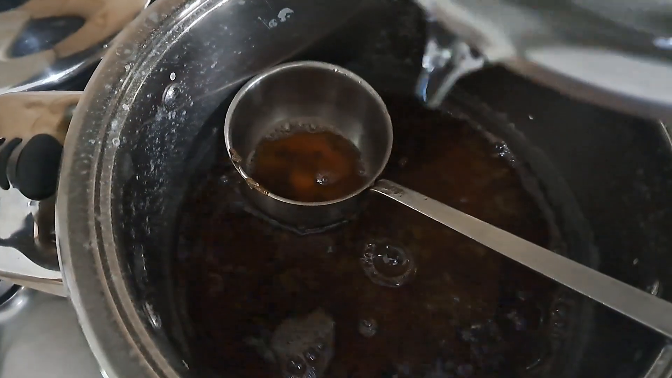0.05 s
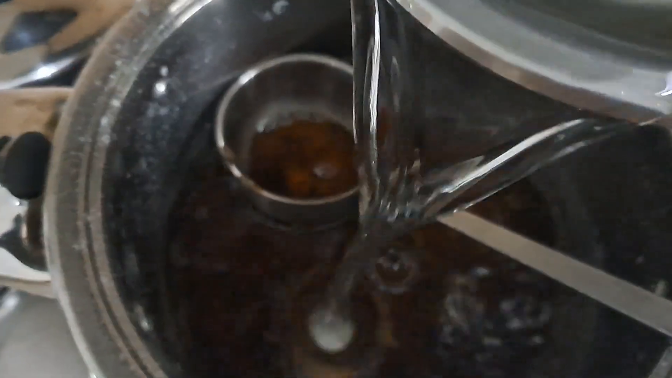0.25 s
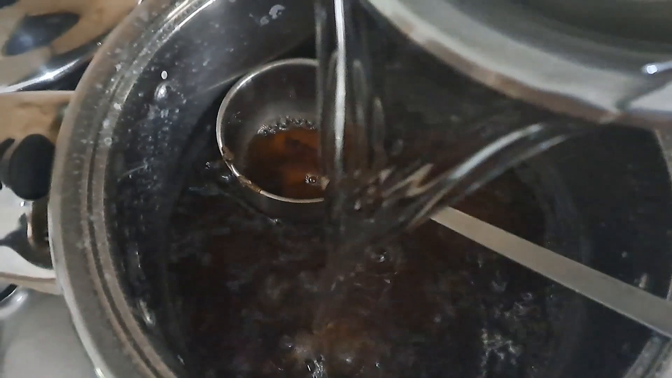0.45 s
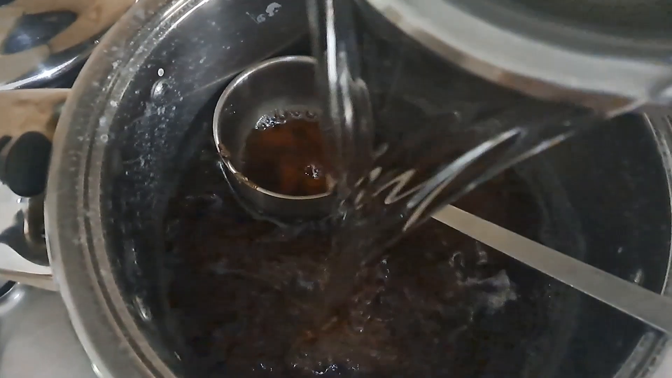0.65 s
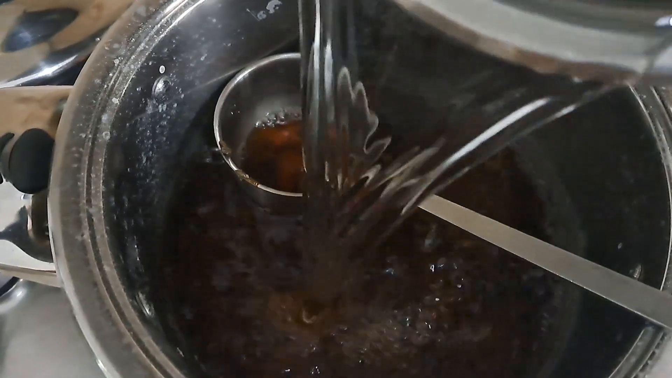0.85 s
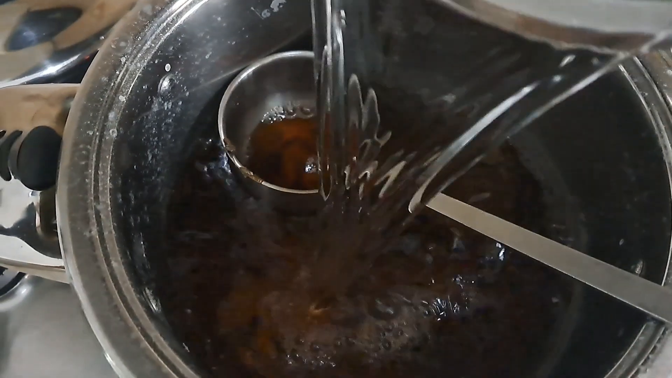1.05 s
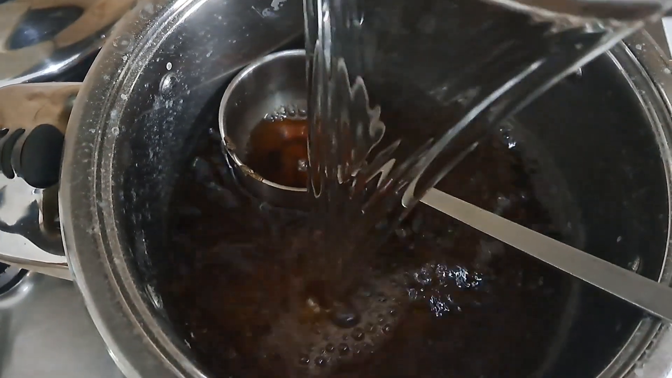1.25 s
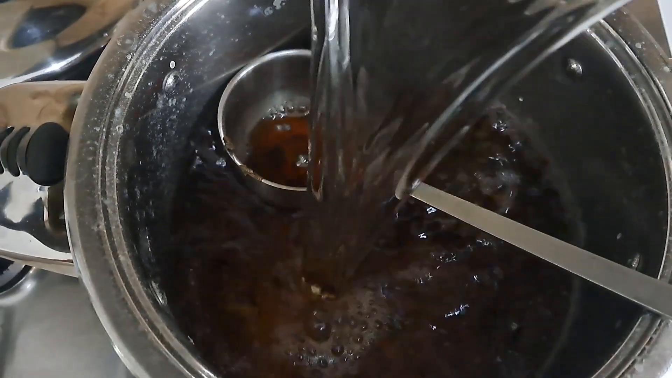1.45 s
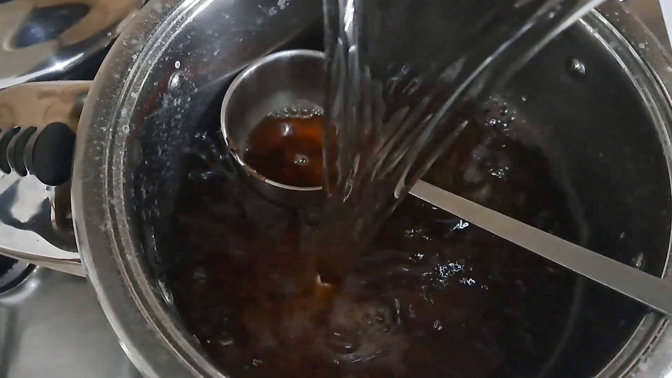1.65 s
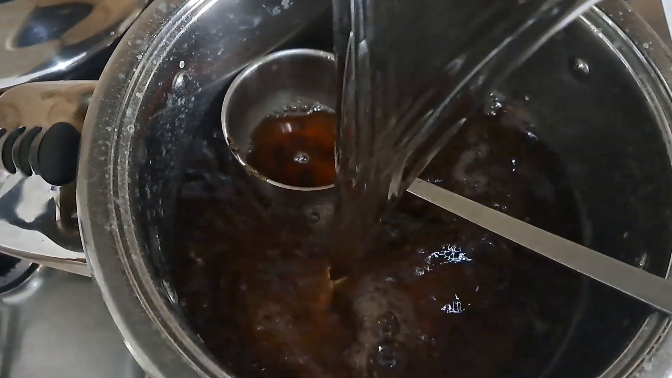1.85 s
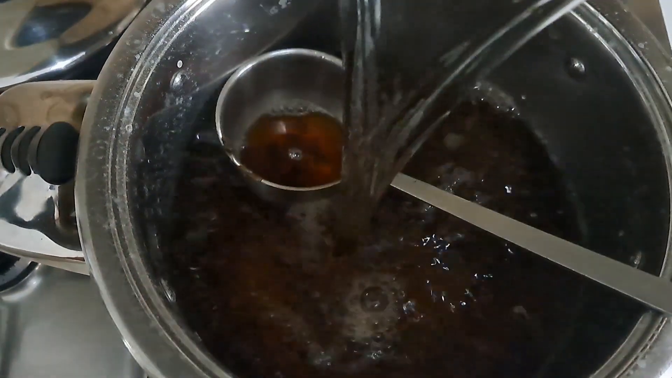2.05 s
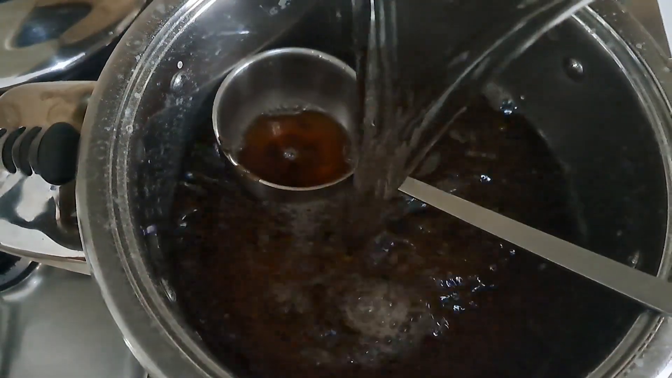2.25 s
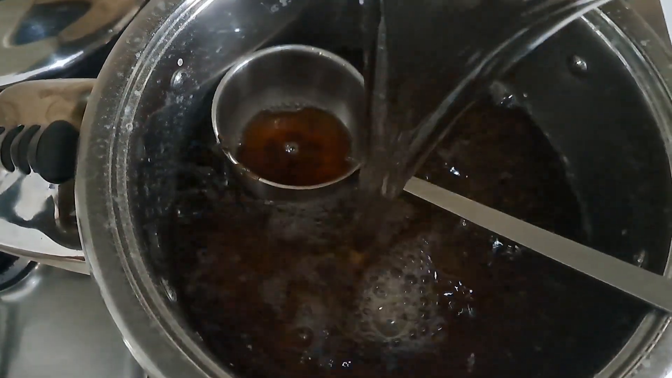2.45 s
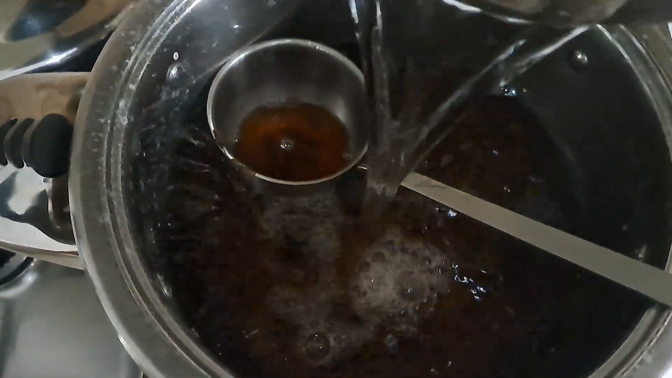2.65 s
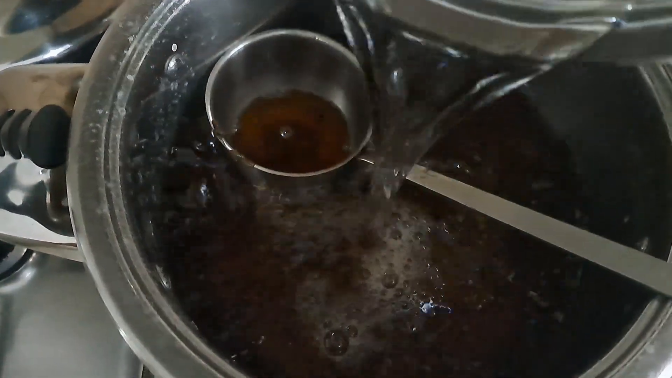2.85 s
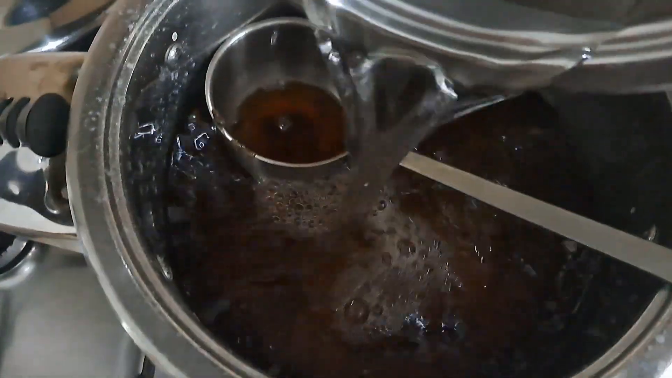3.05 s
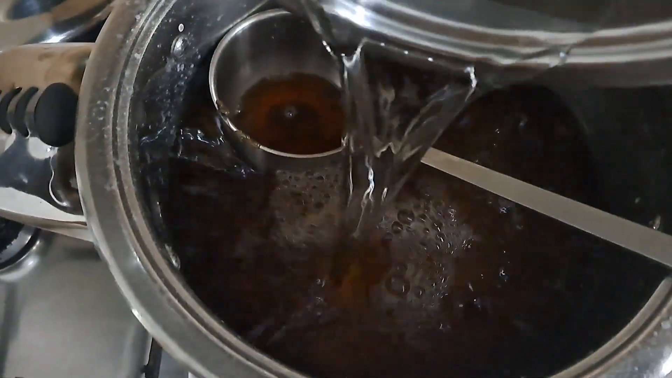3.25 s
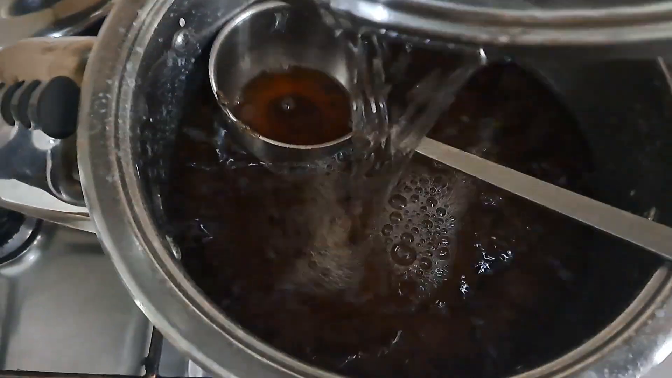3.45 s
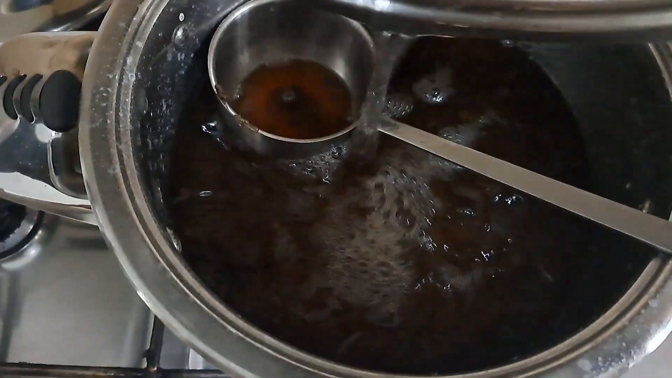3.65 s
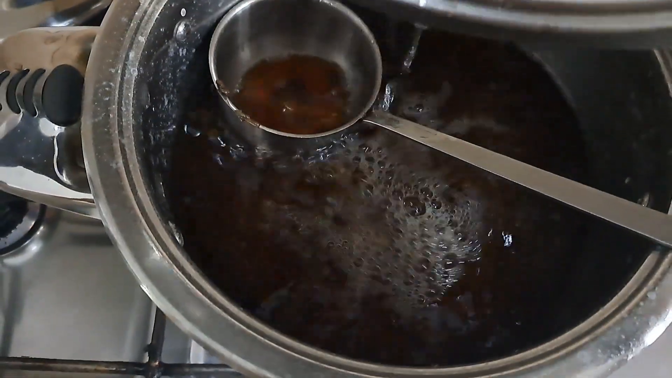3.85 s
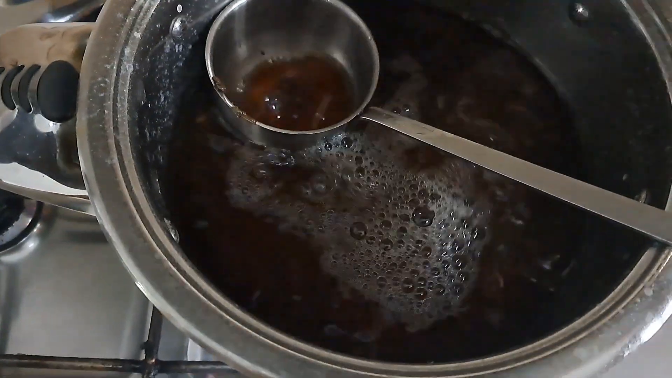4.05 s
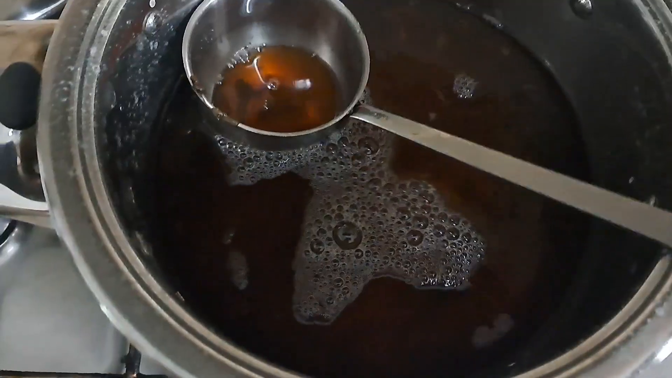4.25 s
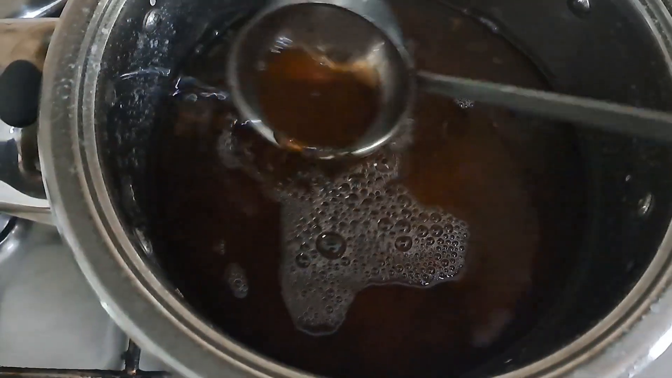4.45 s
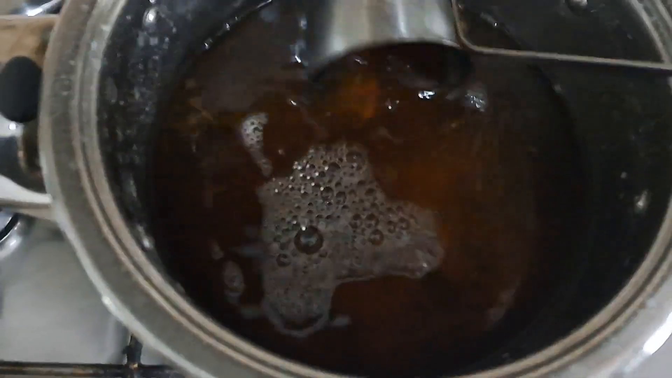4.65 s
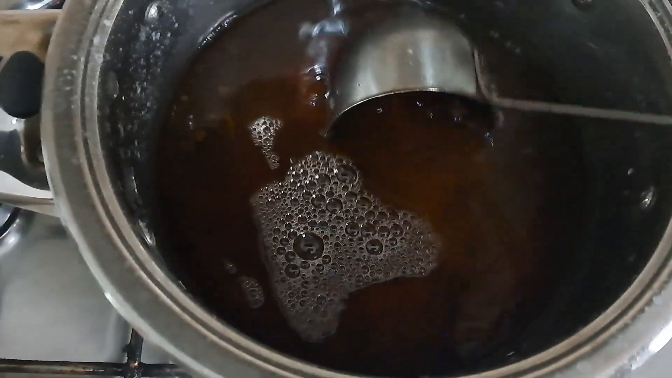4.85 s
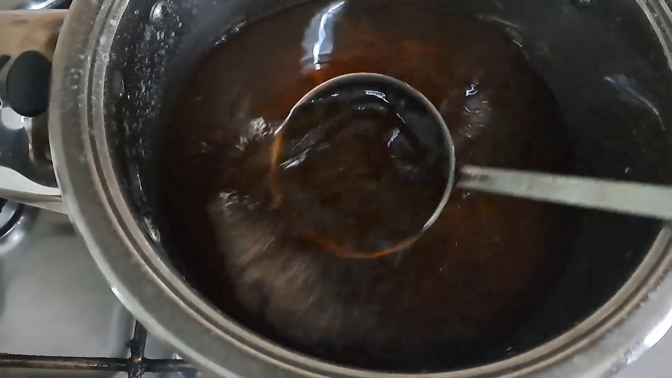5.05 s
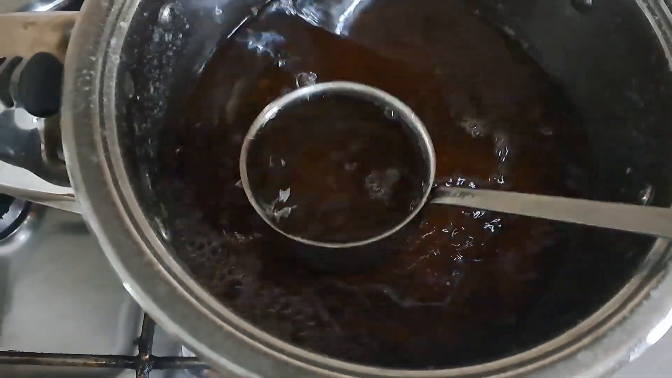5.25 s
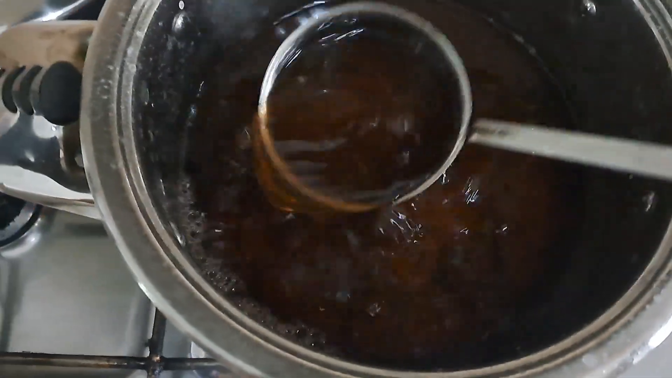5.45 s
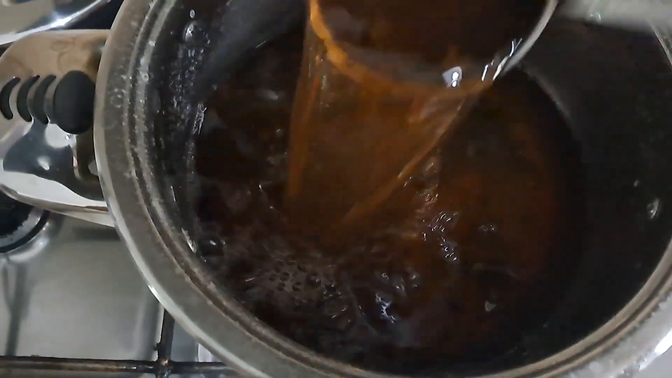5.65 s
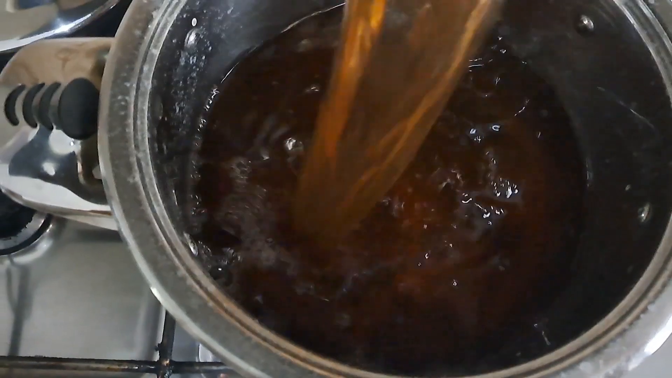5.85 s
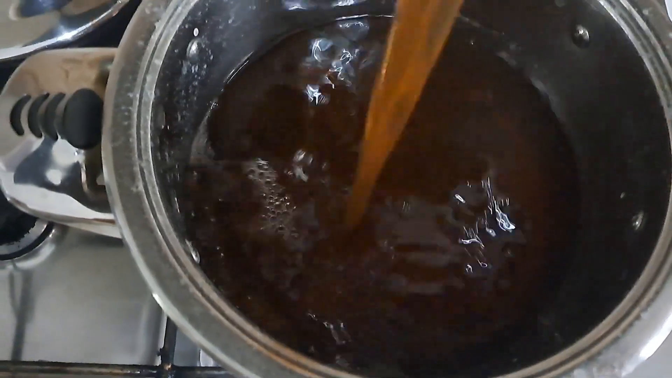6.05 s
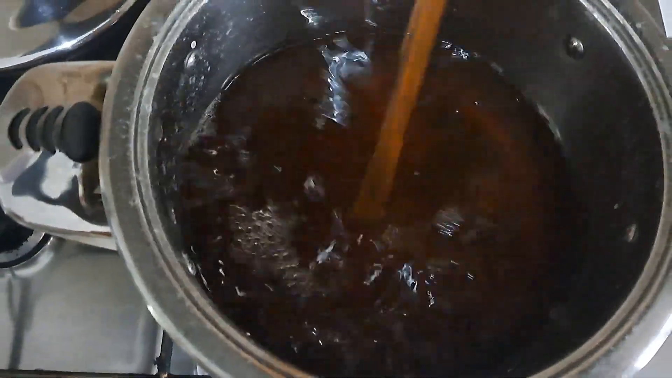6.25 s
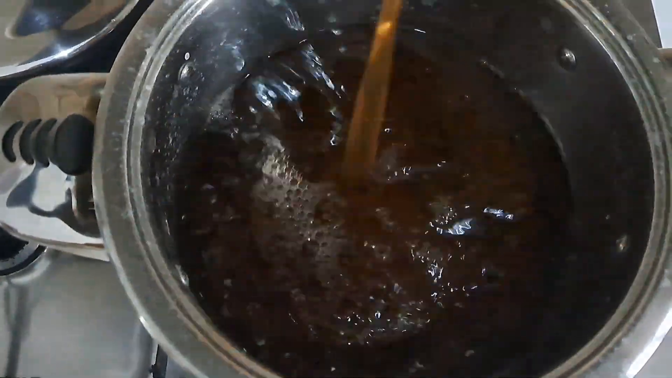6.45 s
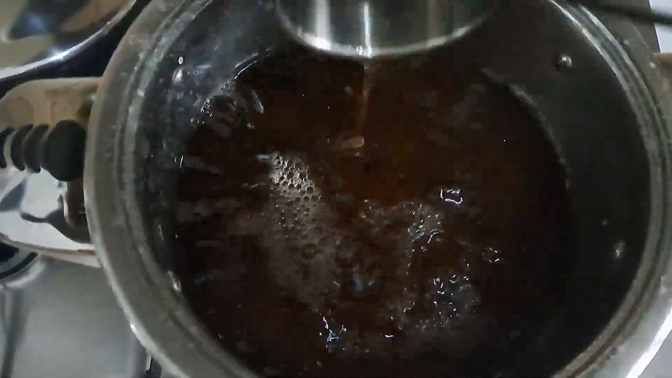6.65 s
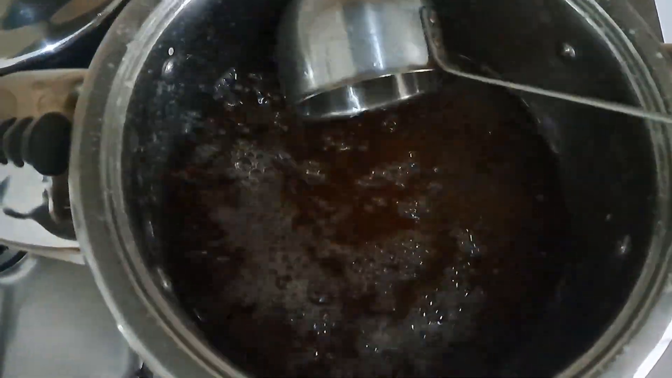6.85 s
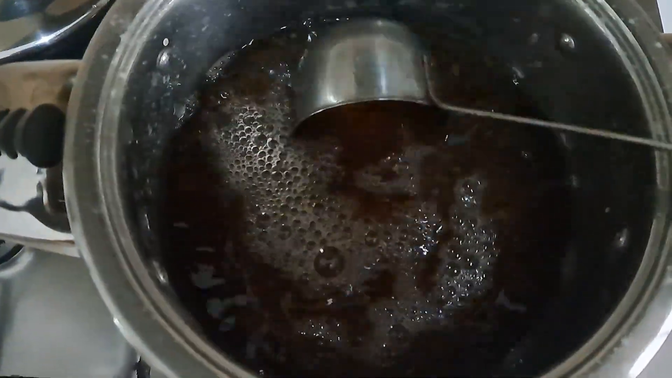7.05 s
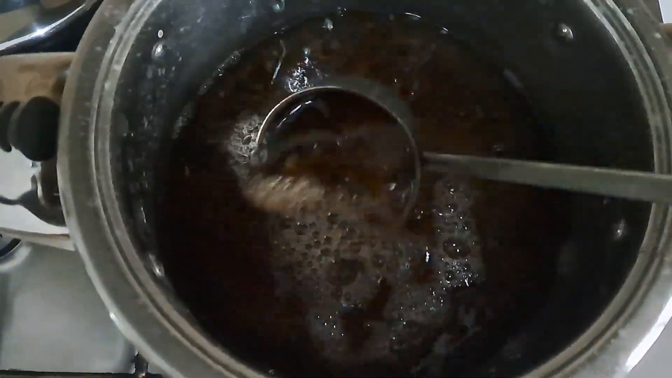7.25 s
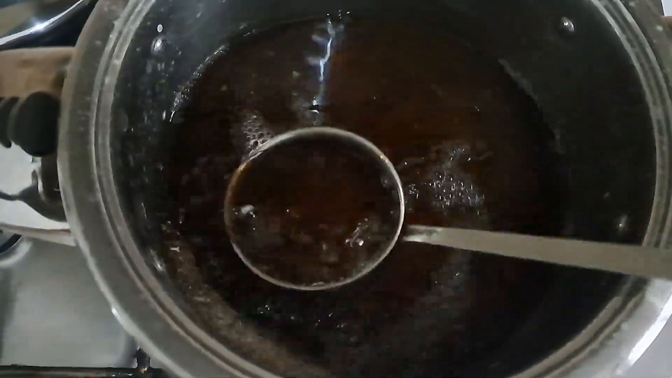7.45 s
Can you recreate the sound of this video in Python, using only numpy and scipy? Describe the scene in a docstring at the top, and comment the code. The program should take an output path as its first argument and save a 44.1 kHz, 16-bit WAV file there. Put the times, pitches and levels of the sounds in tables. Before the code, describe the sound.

Water pours heavily into a steel pot of simmering broth, then a metal ladle scrapes, clanks, scoops, trickles liquid back and knocks the bottom.

```python
"""For four seconds water pours into a steel pot of hot broth: a wobbling flow drives swarms of ringing bubbles,
shaped noise makes the spray, and short swells of fine hiss and splash come and go throughout. A steel ladle
then rubs, knocks and scrapes the pot (damped modes, noise bursts, stick-slip), plunges in and is lifted
singing. Its load trickles back in beads and plops, and at the end it knocks the bottom and plunges again.
Under it all lie simmering bubbles, a burner's noise roar, a low rumble and a beating hum."""
import sys
import numpy as np
from scipy import signal
from scipy.fft import rfft, irfft
from scipy.io import wavfile

SR = 44100
rng = np.random.default_rng(int(sys.argv[2]) if len(sys.argv) > 2 else 0)


def to_wav(sig):
    """Store sig (one row per channel, or 1-D mono) as 16-bit WAV at the path in sys.argv[1].

    Samples outside -1..1 are clipped; the rate is SR.
    """
    pcm = np.clip(np.atleast_2d(sig), -1, 1) * 32767
    pcm = np.round(pcm).astype(np.int16)
    wavfile.write(sys.argv[1], SR, pcm.T)  # frames by channels


N = 330750
TIME = np.arange(N) / SR
HZ = np.fft.rfftfreq(8192, 1 / SR)  # frequency grid for all colour curves

# Stream from the upper pot. Each row: time in seconds, strength in dB (FULL_DB is full flow).
POUR_STREAM = [(0.0, -68), (0.02, -66), (0.27, -65), (0.36, -53), (0.37, -45), (0.47, -49), (0.81, -45.5),
               (0.88, -56.5), (0.98, -57.5), (1.05, -45), (1.44, -50.5), (1.49, -45.5), (1.58, -35),
               (1.74, -44), (1.92, -36), (2.73, -39), (2.82, -33.5), (2.91, -42), (3.29, -40), (3.34, -34),
               (3.54, -42.5), (3.73, -38.5), (3.92, -57)]
# Stream off the ladle. Each row: time in seconds, strength in dB (FULL_DB is full flow).
LADLE_STREAM = [(5.77, -53), (5.786, -55.5), (5.948, -55), (6.034, -39.5), (6.45, -43.5), (6.545, -49),
                (6.562, -45), (6.662, -42.5), (6.73, -51), (6.76, -79)]
# The bowl goes under and broth rushes in. Each row: start in seconds, flow in dB (FULL_DB is full flow).
PLUNGES = [(4.87, -46.5), (7.205, -41)]
FULL_DB = -38
PLUNGE_RISE_S = 0.038

# Air in the pot with the top clear. Each row: resonance in Hz, width in Hz, lift in dB.
AIR_OPEN = [(490, 56, 6.8), (690, 120, 10.8), (850, 77, 9.1), (1294, 140, 7.9), (2000, 66, 4.7)]
# Air in the pot as it colours burner and simmer. Each row: resonance in Hz, width in Hz, lift in dB.
BURNER_AIR = [(633, 62, 16.3), (712, 78, 23), (1447, 105, 10.8)]
# Colour of the spray. Each row: frequency in Hz, relative level in dB per Hz.
SPRAY_COLOUR = [(1500, -12), (3000, -7), (4400, -0.5), (6000, -2.5), (7700, -0.5), (8400, -7), (9300, -8.5),
                (10400, -4.5), (13000, -3.5), (15400, -10)]
# Modes of the ladle's bowl. Each row: pitch in Hz, relative level in dB, ring time t60 in seconds.
BOWL_MODES = [(966, -6.5, 0.084), (1717, -9, 0.07), (1965, -1.5, 0.07), (2060, -7, .05), (2220, -5, .06),
              (2400, 2, 0.07), (2510, 5.5, 0.09), (2590, -3, .06), (2710, -2, 0.06), (3876, -17, .04),
              (5023, -14, .05), (7500, -6, 0.017)]


def amp(db):
    """Turns dB into a linear gain."""
    return 10 ** (np.asarray(db) / 20)


def unit(x):
    """Scales to rms 1."""
    return x / np.sqrt(np.mean(x ** 2) + 1e-20)


def read(points, hz):
    """Joins (Hz, value) points on a log-frequency axis."""
    f, value = np.transpose(points)
    return np.interp(np.log(hz + 1), np.log(f + 1), value)


def add(mix, s, sound):
    """Adds a stereo sound at time s in seconds."""
    part = mix[:, max(round(s * SR), 0):][:, :sound.shape[1]]
    part += sound[:, :part.shape[1]]


def convolve(x, response):
    """Filters by an impulse response, keeping the length."""
    return signal.oaconvolve(np.atleast_2d(x), np.atleast_2d(response), axes=1)[:, :x.shape[-1]]


def colour(x, db):
    """Minimum-phase filter with the given dB at each of HZ."""
    mirrored_db = np.r_[db, db[-2:0:-1]]
    log_gain = np.log(amp(np.maximum(mirrored_db, -100)))
    response = np.fft.ifft(np.exp(np.conj(signal.hilbert(log_gain)))).real
    return convolve(x, response[:len(HZ)])


def resonance_db(resonances):
    """dB added at each of HZ by a set of resonances."""
    lift = 0
    for hz, width, db in resonances:
        lift = lift + (amp(db) ** 2 - 1) / (1 + (2 * (HZ - hz) / width) ** 2) ** 1.93
    return 10 * np.log10(1 + lift.clip(-.9))


def band_db(lo_hz, hi_hz, order=2):
    """dB of a band-pass at each of HZ; with lo_hz above hi_hz it is a hump between them."""
    low_side = 1 + (lo_hz / (HZ + 1)) ** (2 * order)
    high_side = 1 + (HZ / hi_hz) ** (2 * order)
    return -10 * np.log10(low_side * high_side)


def pair(x):
    """Two unrelated signals become what two close microphones hear: alike in the bass, apart in the treble."""
    # Each row: frequency in Hz, likeness of the two microphones from 0 to 1.
    likeness = [(60, .99), (300, .97), (700, .93), (1300, .55), (2400, .05), (5000, 0), (15000, 0)]
    size = x.shape[1]
    same = np.clip(read(likeness, np.fft.rfftfreq(size, 1 / SR)), -1, 1)
    mid, side = rfft(x) * np.sqrt([(1 + same) / 2, (1 - same) / 2])
    return irfft(np.array([mid + side, mid - side]), size)


def pair_noise(size):
    """White noise as the two microphones hear it."""
    return pair(rng.standard_normal((2, size)))


def flow(points, fade_db=350):
    """Strength of a stream, 1 at full flow; it dies away by fade_db a second and sets in four times as fast."""
    s, db = np.transpose(points)
    outside = np.maximum(TIME - s[-1], 0) + 4 * np.maximum(s[0] - TIME, 0)
    return amp(np.interp(TIME, s, db) - FULL_DB - fade_db * outside)


def surge(s, rise_s, fade_db_per_s):
    """A quick rise at time s under a steady fade."""
    t = np.maximum(TIME - s, 0)
    return np.minimum(t / rise_s, 1) * amp(-fade_db_per_s * t)


def unsteady(per_s, depth_db):
    """A gain that wanders at random, per_s steps a second."""
    steps = rng.standard_normal(2000)
    return amp(depth_db * np.interp(TIME * per_s, np.arange(len(steps)), steps))


def flickering(x, per_s, depth_db):
    """The spray breaks up unevenly: six overlapping ranges of its spectrum come and go independently."""
    spectrum, hz = rfft(x), np.fft.rfftfreq(N, 1 / SR)
    centres = np.geomspace(2000, 14000, 6)
    out = 0
    for share in np.eye(len(centres)):
        part = irfft(spectrum * np.interp(hz, centres, share), N)
        out = out + part * unsteady(per_s, depth_db)
    return out


def bubble(t, hz, t60, rise):
    """A bubble rings down while its pitch climbs by the share rise per t60, as if nearing the surface."""
    t = np.maximum(t, 0)
    tone = np.sin(2 * np.pi * hz * t * (1 + rise * t / (2 * t60)))
    return tone * amp(-60 * t / t60) * (1 - np.exp(-2 * t * hz))


def swarm(per_s, lo_hz, hi_hz, cycles, spread_db, rise, count):
    """Random bubbles of count sizes; each reaches the two microphones with its own delay."""
    out, gap_s = np.zeros((2, N + SR)), .00025
    for hz in np.geomspace(lo_hz, hi_hz, count):
        bubbles = max(int(per_s * N / SR / count), 1)
        place, size, detune, life, angle = rng.random((bubbles, 5)).T[:, :, None]
        steps = np.arange(min(int(cycles / hz * SR), SR))
        gain = amp(spread_db * np.minimum(-np.log(1 - size), 3.5)) * hz / lo_hz
        at = ((place * N).astype(int) + steps).ravel()
        for channel, side in enumerate((1, -1)):
            t = steps / SR - side * gap_s * (angle - .8)
            rings = gain * bubble(t, hz * (0.9396 + 0.127 * detune), cycles / hz * (.5 + life), rise)
            out[channel] += np.bincount(at, rings.ravel(), N + SR)
    return out[:, :N]


def crackle(per_s, spread_db, hiss_db):
    """Tiny clicks of uneven size over a fine hiss, reaching each microphone at slightly different moments."""
    at, size, delay = rng.random((3, 200000))[:, :int(per_s * N / SR)]
    gain = amp(spread_db * np.minimum(-np.log(1 - size), 5)) * (-1) ** np.arange(len(at))
    clicks = []
    for side in (1, -1):
        sample = (at * N + side * 14 * (delay - .7)).astype(int) % N
        clicks.append(np.bincount(sample, gain, N))
    return unit(np.array(clicks)) + amp(hiss_db) * rng.standard_normal((2, N))


def burst(t60, lo_hz, hi_hz, order=2):
    """A short dying puff of noise, levelled by its energy over its ring time."""
    t = np.arange(4096) / SR
    puff = colour(pair_noise(len(t)) * amp(-60 * t / t60), band_db(lo_hz, hi_hz, order))
    return puff / np.sqrt(np.sum(puff ** 2) / (t60 * SR)) / 5


def ring(modes):
    """Steel modes die away as sines; the higher ones reach the two microphones further out of phase."""
    t, out = np.arange(SR * 3 // 4) / SR, 0
    for k, (hz, db, t60) in enumerate(modes):
        skew = min(hz / 4500, .8) * np.array([[1], [-1]])  # radians
        out = out + (-1) ** k * amp(db - 60 * t / t60) * np.sin(2 * np.pi * hz * t + skew)
    return out


def resonate(x, hz, t60):
    """A driven mode whose pitch follows the curve hz."""
    turn = np.exp(2j * np.pi * np.cumsum(hz) / SR)
    return (turn * signal.lfilter([1], [1, -amp(-60 / (t60 * SR))], x / turn)).real


def liquid(gurgle, patter, spray, gains, air, climb=0, early_share=1):
    """Large and small bubbles ring the air in the pot, whose pitch can climb as it fills; spray stays clear."""
    # Left minus right. Each row: frequency in Hz, difference in dB.
    lean_points = [(200, 4), (700, 0), (1290, -5), (2400, -0.5), (4400, -3), (8100, -2), (14000, 3)]
    filled = np.minimum(TIME / POUR_STREAM[-1][0], 1) ** 2
    early = resonance_db([(hz * (1 - climb / 2), width, db) for hz, width, db in air])
    late = resonance_db([(hz * (1 + climb), width, db) for hz, width, db in air])
    early = early_share * early + (1 - early_share) * early.max() / 2  # a smaller share is less hollow

    def hollow(x, db):
        """Crossfades from the early to the late air resonances."""
        return colour(x * (1 - filled), early + db) + colour(x * filled, late + db)

    layers = (hollow(gurgle, band_db(385, 1380)),
              hollow(patter, 0),
              colour(spray, read(SPRAY_COLOUR, HZ) + band_db(1700, 25000)))
    wet = sum(gain * unit(x) for gain, x in zip(gains, layers))
    lean = read(lean_points, HZ) / 2
    return np.vstack([colour(wet[0], lean), colour(wet[1], -lean)])


def pour():
    """A thick, wobbling stream drives a dense cloud of bubbles into the broth."""
    # Air in the pot under the stream. Each row: resonance in Hz, width in Hz, lift in dB.
    air_covered = [(485, 80, 5), (638, 62, 14.5), (705, 80, 15.3), (1265, 130, 10.5), (1815, 105, 11.8),
                   (1950, 170, 7.5)]
    # Gurgle, patter, spray in turn. Each row: relative level in dB at full flow, dB per dB of flow.
    pour_law = [(-40.5, 0.76), (-36, 1.0), (-31, 1.14)]
    gurgle = swarm(per_s=750, lo_hz=330, hi_hz=1070, cycles=8, spread_db=1.2, rise=0.13, count=20)
    patter = swarm(per_s=1600, lo_hz=1077, hi_hz=3500, cycles=14, spread_db=2.4, rise=0.22, count=24)
    fine = swarm(per_s=2400, lo_hz=3320, hi_hz=14000, cycles=120, spread_db=0.5, rise=0.043, count=30)
    spray = unit(crackle(per_s=4900, spread_db=3.5, hiss_db=6.0)) + amp(-11.0) * unit(fine)
    spray = flickering(spray, per_s=90, depth_db=2.1)
    stream = flow(POUR_STREAM) * unsteady(per_s=50, depth_db=1.04)
    gains = [amp(db) * stream ** power for db, power in pour_law]
    # the air rings less at first, while the upper pot is still held high
    return liquid(gurgle, patter, spray, gains, air_covered, climb=.03, early_share=0.68)


def glugs(follow=0.19, trickle_db=-25):
    """Both streams push big pockets of air under, as soon as they are more than a trickle."""
    pockets = unit(swarm(per_s=180, lo_hz=149, hi_hz=500, cycles=8.7, spread_db=1.0, rise=0.12, count=12))
    pour_db = -44.5 - 6.5 * TIME  # deep glugs fade as the broth gets deeper
    ladle_db = -55.5  # the ladle's stream falls from higher up and digs deep again
    gain = 0
    for stream, db in ((flow(POUR_STREAM), pour_db), (flow(LADLE_STREAM) ** 2, ladle_db)):
        gain = gain + amp(db) * np.minimum(stream / amp(trickle_db), 1) * stream ** follow
    return pockets * gain


def spatter():
    """Stray drops from the wide stream tick on the surface, even when it is weak."""
    ticks = unit(colour(crackle(per_s=110, spread_db=3.5, hiss_db=-30), read(SPRAY_COLOUR, HZ)))
    return amp(-45.5) * ticks * np.minimum(flow(POUR_STREAM) / amp(-12), 1) ** 2


def foam(life_s=0.27):
    """Foam builds up under both streams and goes on bursting for a moment."""
    keep = np.exp(-1 / (life_s * SR))
    amount = signal.lfilter([1 - keep], [1, -keep], flow(POUR_STREAM) + flow(LADLE_STREAM))
    bursting = unit(colour(crackle(per_s=550, spread_db=10.0, hiss_db=-4), read(SPRAY_COLOUR, HZ)))
    return amp(-53) * amount * bursting


def hiss_swells(steepness=4, gurgle_db=-9):
    """Short swells of fine hiss and splash: waves on the hot wall, the ladle's rub, the breaking stream."""
    # Each row: start in seconds, time to the crest in seconds, relative hiss in dB, relative splash in dB.
    swell_rows = [(.125, 0.036, -58, -62), (0.293, 0.036, -37, -48.5), (.33, 0.066, -39, -56),
                  (.64, 0.08, -38, -45), (.985, 0.065, -30.5, -42.5), (1.405, 0.031, -35, -64),
                  (1.41, 0.093, -32, -47), (1.8, 0.13, -29, -48), (2.07, 0.13, -31.5, -43.5),
                  (2.48, 0.094, -26.5, -43), (2.625, 0.13, -20.5, -57), (2.99, 0.091, -31, -40.5),
                  (3.28, 0.15, -28.5, -40), (3.55, 0.093, -30.5, -44), (4.378, 0.048, -42, -46),
                  (5.108, .012, -38.5, -41), (5.159, 0.06, -26, -33.5), (1.12, 0.038, -43, -45),
                  (5.96, 0.063, -27.5, -37.5), (6.255, 0.03, -34, -36), (6.535, 0.058, -37.5, -46),
                  (6.988, 0.057, -36, -38.5), (7.07, 0.08, -42.5, -45.5), (7.32, 0.03, -47.5, -57)]
    gurgle = swarm(per_s=980, lo_hz=400, hi_hz=980, cycles=4.5, spread_db=1.5, rise=.1, count=12)
    patter = colour(crackle(per_s=5700, spread_db=-5.5, hiss_db=3.5), band_db(1330, 3320, order=4))
    spray = flickering(crackle(per_s=7000, spread_db=4.0, hiss_db=2.5), per_s=110, depth_db=1.45)
    hiss = splash = 0
    for s, crest_s, hiss_db, splash_db in swell_rows:
        age = np.maximum(TIME - s, 0) / crest_s
        swell = (age * np.exp(1 - age)) ** steepness
        hiss = hiss + amp(hiss_db) * swell
        splash = splash + amp(splash_db) * swell
    return liquid(gurgle, patter, spray, [amp(gurgle_db) * splash, splash, hiss], AIR_OPEN)


def plunge_rush(fade_db_per_s):
    """Flow of broth into the bowl at each plunge, 1 at full flow before the fade."""
    return sum(amp(db - FULL_DB) * surge(s, PLUNGE_RISE_S, fade_db_per_s) for s, db in PLUNGES)


def ladling():
    """The ladle's plunges and its thin stream make fewer, more distinct bubbles."""
    # Gurgle, patter, spray in turn. Each row: relative level in dB at full flow, dB per dB of flow.
    ladling_law = [(-38, 1.25), (-41.5, 0.7), (-38.5, 1.06)]
    gurgle = swarm(per_s=900, lo_hz=400, hi_hz=1100, cycles=7.5, spread_db=1.8, rise=0.18, count=20)
    patter = swarm(per_s=1500, lo_hz=1000, hi_hz=3500, cycles=10, spread_db=3.0, rise=0.15, count=24)
    fine = swarm(per_s=1300, lo_hz=2300, hi_hz=7000, cycles=40, spread_db=5.0, rise=0.05, count=20)
    spray = unit(crackle(per_s=700, spread_db=3.5, hiss_db=-11)) + amp(-4.0) * unit(fine)
    rush = plunge_rush(fade_db_per_s=89)
    # a plunge also shoves the whole body of broth
    shove = amp(-38) * rush * unit(colour(pair_noise(N), band_db(80, 170)))
    stream = (flow(LADLE_STREAM) + rush) * unsteady(per_s=70, depth_db=3.5)  # the thin stream breaks into beads
    gains = [amp(db) * stream ** power for db, power in ladling_law]
    return liquid(gurgle, patter, spray, gains, AIR_OPEN) + shove


def churn():
    """Air dragged under by the bowl gurgles densely for a moment."""
    bubbles = swarm(per_s=1000, lo_hz=340, hi_hz=1870, cycles=11.0, spread_db=4.0, rise=.15, count=18)
    return amp(-43) * unit(bubbles) * plunge_rush(fade_db_per_s=99)


def knocks():
    """Each blow of ladle on pot cracks, thuds through the liquid and rings pot and bowl."""
    # The pot. Each row: pitch in Hz, t60 in seconds, relative dB struck on the wall, and on the bottom.
    pot_modes = [(135, 0.47, -31, -24.5), (356, 0.13, -23, -11), (700, 0.049, -14, -2.5),
                 (843, 0.035, -3.5, -2.5), (950, 0.16, -9.5, -3.5), (1135, 0.19, -22, -16.5),
                 (1344, 0.065, -26, -16), (1468.5, 0.13, -4, -12), (1616, 0.02, 3.5, 2.5),
                 (1774, 0.029, -3, -14), (2150, 0.068, -20, -12), (2324, 0.28, -20.5, -16.5),
                 (2300, 0.13, -15, -14), (2500, 0.086, -5, -33), (3590, 0.03, -9, -24),
                 (4050, .03, -11, -22), (4920, 0.036, -14, -9), (6460, 0.013, -24, 2)]
    # Each row: time in seconds, then relative dB on the wall, on the bottom, of the bowl's ring, of the
    # crack and of the thud, low edge of the thud in Hz.
    blows = [(4.853, -15, -60, -31, -16.5, -13, 700), (4.8582, -38, -60, -50, -24, -25, 700),
             (4.8907, -23, -60, -54, -45, -49, 700), (4.942, -50, -60, -28, -18, -50, 700),
             (4.977, -61, -60, -30.5, -48, -55, 700), (7.1828, -48, -14.5, -55, -13, -7.5, 250),
             (7.1852, -60, -47, -55, -20, -15.5, 400), (7.219, -48.5, -34, -52, -32, -16, 251),
             (7.249, -41, -34, -54, -31, -34, 320), (7.269, -50, -46, -56, -34, -43, 320)]
    out = np.zeros((2, N))
    wall = ring([(hz, wall_db, t60) for hz, t60, wall_db, _ in pot_modes])
    bottom = ring([(hz, bottom_db, t60) for hz, t60, _, bottom_db in pot_modes])
    bowl = ring(BOWL_MODES)
    for s, wall_db, bottom_db, bowl_db, crack_db, thud_db, thud_hz in blows:
        add(out, s, amp(wall_db) * wall + amp(bottom_db) * bottom + amp(bowl_db) * bowl)
        add(out, s, amp(crack_db) * burst(0.013, 4200, 5200))
        add(out, s, amp(thud_db) * burst(0.0083, thud_hz, 2330, order=3))
        add(out, s, amp(thud_db - 23.5) * burst(0.61, thud_hz / 2, 1700))  # the liquid churns on
    return out * amp([[-.9], [.7]])  # left and right gain in dB


def scrape(slips_per_s=1100, slip_s=0.0024):
    """The rim sticks and slips; each slip is a rasping puff that rings the bowl, which sags in pitch as it fills."""
    # Rim along the wall. Each row: start, rise and length in seconds, relative bowl ring and rasp in dB.
    strokes = [(4.393, .004, 0.02, -71, -48.5), (4.411, .006, 0.032, -62, -49),
               (4.811, 0.03, .05, -79, -41), (4.846, .005, 0.062, -38, -44),
               (4.936, .005, 0.075, -31.5, -41), (5.013, 0.0065, 0.031, -38, -41),
               (5.048, .01, 0.056, -52, -49)]
    # Colour of the rasp. Each row: frequency in Hz, relative level in dB per Hz.
    rasp_colour = [(100, 4), (260, 3.5), (420, -7), (800, -4), (1500, -1), (2500, -6), (3300, -2),
                   (5500, -4.5), (7600, 6), (8800, -13), (12000, -14), (15000, -23)]
    ease_db_per_s, release_db_per_s = 63, 350
    fill_start_s, fill_s, empty_pitch, sag_per_s = 4.97, 0.075, 1.01, 0.41
    slips = (rng.random(N) < slips_per_s / SR) * rng.uniform(0.35, 1, N)
    puffs = signal.lfilter([1], [1, -np.exp(-1 / (slip_s * SR))], slips)
    drive = unit(puffs * pair_noise(N))
    press = rasp = 0
    for s, rise_s, length, ring_db, rasp_db in strokes:
        release = amp(-release_db_per_s * np.maximum(TIME - s - length, 0))
        stroke = surge(s, rise_s, ease_db_per_s) * release
        press = press + amp(ring_db) * stroke
        rasp = rasp + amp(rasp_db) * stroke
    near = (TIME > strokes[0][0]) & (TIME < strokes[-1][0] + 1)
    push = (drive * press)[:, near]
    pitch = empty_pitch - sag_per_s * np.clip(TIME[near] - fill_start_s, 0, fill_s)
    # keeps the ring at the level of the push
    power = sum(amp(db) ** 2 * t60 for _, db, t60 in BOWL_MODES) * SR / (4 * np.log(1000))
    out = unit(colour(drive, read(rasp_colour, HZ))) * rasp
    for hz, db, t60 in BOWL_MODES:  # the contact travels round the rim and pulls each mode off pitch
        pull = unsteady(per_s=45, depth_db=.13)[near]
        out[:, near] += amp(db) * resonate(push, hz * pitch * pull, t60) / np.sqrt(power)
    return out


def lifted(twin_db=-15, twin_pitch=1.004):
    """The rim rubs free and the bowl sings, each mode beating with a twin; a load of broth mutes the side modes."""
    # The ladle ringing free. Each row: pitch in Hz, relative level in dB, t60 in seconds.
    free_modes = [(1281, -8, .2), (1730, -15, .25), (2313, -1, .65), (2378, -10, .3), (2805, -13, .25),
                  (3332, -16, .3), (3985, -11, .18), (4900, -8, .16), (7290, -12, .2), (7833, -14, .12)]
    # Each row: start in seconds, relative ring in dB, pitch factor (lower when full), ring time factor,
    # rub in dB, muting in dB per octave from the main mode.
    lift_events = [(4.393, -44.5, 1, 1.05, -44, -3), (5.05, -37.5, 0.958, 1.35, -62, -14)]
    rub_s, rub_fade_db_per_s, rub_t60_s = 0.049, 300, 0.041  # while it still rubs, the bowl is damped
    out, t = np.zeros((2, N)), np.arange(SR // 4) / SR
    main_hz = max(free_modes, key=lambda mode: mode[1])[0]
    for s, db, pitch, sustain, rub_db, mute_db in lift_events:
        modes = []
        for hz, mode_db, t60 in free_modes:
            muted_db = mode_db + mute_db * abs(np.log2(hz / main_hz))
            modes.append((hz * pitch, muted_db, t60 * sustain))
        twins = [(hz * twin_pitch, mode_db, t60) for hz, mode_db, t60 in modes]
        add(out, s, amp(db) * (ring(modes) + amp(twin_db) * ring(twins)))
        damped = ring([(hz * pitch, 0, rub_t60_s) for hz, _, _ in free_modes])
        rub = unit(convolve(pair_noise(len(t)), damped))
        add(out, s, amp(rub_db - rub_fade_db_per_s * np.maximum(t - rub_s, 0)) * rub)
    return out


def drips(pip_cycles=59, pip_rise=0.042):
    """Single large bubbles plop with a puff of noise; small ones trapped by beads of the ladle's stream pip."""
    # Large bubbles. Each row: start in seconds, level in dB, pitch in Hz, t60 in seconds, pitch rise as a
    # share per t60.
    plops = [(.154, -27, 555, 0.028, 0.12), (0.283, -27.5, 480, 0.025, .2), (.333, -34, 526, 0.031, .1),
             (.446, -32, 570, 0.04, .1), (.37, -31, 602, 0.088, .1), (0.379, -28, 1270, 0.043, .1),
             (.593, -31, 1255, 0.047, .1), (.628, -27, 760, 0.029, 0.092),
             (2.785, -24.5, 644, 0.046, 0.092), (3.263, -27, 500, 0.025, .1),
             (3.337, -26, 1912, 0.17, 0.033), (3.612, -29, 690, 0.061, 0.11), (3.68, -32, 473, 0.081, .1),
             (3.73, -38, 470, 0.1, .1), (3.778, -35, 472, 0.067, 0.074), (3.902, -24, 766, 0.1, 0.12),
             (5.591, -32.5, 2150, 0.028, 0.12), (5.668, -30.5, 2900, 0.015, .05),
             (5.684, -26, 724, 0.085, 0.032), (5.969, -30.5, 875, 0.027, .1), (6.054, -38, 643, 0.03, .1),
             (6.095, -26, 1365, 0.068, 0.11), (6.132, -20.5, 458, 0.049, 0.13),
             (6.134, -23, 844, 0.028, .1), (6.205, -28.5, 1385, .044, .1), (6.231, -27, 467, 0.054, 0.22),
             (6.329, -28.5, 660, 0.037, 0.093), (6.379, -30, 690, 0.04, .1),
             (6.442, -28.5, 1000, 0.041, 0.11), (6.464, -31.5, 800, .04, 0.092),
             (6.5695, -24.5, 2560, 0.025, .05), (6.6, -28.5, 676, 0.09, 0.12),
             (6.652, -25, 476, 0.067, 0.13), (6.691, -31, 480, 0.041, 0.14),
             (6.783, -30, 1150, 0.032, 0.32), (7.242, -27, 1135, 0.12, .02), (7.248, -26, 710, .03, .1),
             (7.262, -28.5, 1120, 0.11, 0.018), (7.256, -23, 860, 0.045, 0.23),
             (7.267, -26, 555, 0.086, 0.23), (7.284, -22, 602, 0.091, 0.78), (7.294, -25, 670, 0.053, 0.26),
             (7.334, -36, 716, 0.046, .05)]
    # Small bubbles. Each row: start in seconds, level in dB, pitch in Hz.
    pips = [(5.673, -31, 2670), (5.866, -37.5, 2250), (5.877, -44, 4200), (6.006, -33, 4670),
            (6.133, -33, 3950), (6.148, -27.5, 2650), (6.172, -29, 2430), (6.18, -38, 3520),
            (6.205, -39, 2200), (6.272, -31, 4700), (6.297, -42, 2860), (6.369, -39, 4160),
            (6.397, -28, 2500), (6.452, -36, 2550), (6.56, -24, 4200), (6.561, -31, 1700),
            (6.583, -29, 2500), (6.59, -27, 3900), (6.599, -25, 4850), (6.612, -21, 4840),
            (6.639, -28, 3020), (6.658, -32, 2470), (6.696, -32, 4580)]
    out, t = np.zeros((2, N)), np.arange(SR // 4) / SR
    for s, db, hz, t60, rise in plops:  # the right microphone hears each a moment later
        add(out, s, amp(db) * bubble(t - np.array([[0], [.00005]]), hz, t60, rise))
        add(out, s, amp(db - 9.5) * burst(0.044, hz * 1.27, hz * 1.45))
    for s, db, hz in pips:
        add(out, s, amp(db) * bubble(t - np.array([[0], [.00003]]), hz, pip_cycles / hz, pip_rise))
    return out


def snaps(snap_s=0.0045, splash_s=0.033, splash_db=-9):
    """Each sharp snap, of a drop on the surface or the ladle's knock, leaves a faint, fine splash (t60 in s)."""
    # Each row: start in seconds, relative level in dB, centre in Hz.
    snap_rows = [(0.156, -37, 6500), (.421, -22, 2600), (0.595, -23, 6000), (0.964, -25, 12000),
                 (1.413, -20, 6000), (3.264, -14.5, 8500), (5.6849, -13.5, 7100), (5.777, -38, 8000),
                 (5.7822, -24.5, 7500), (5.8, -31, 9000), (5.817, -26, 2590), (5.922, -23, 11500),
                 (5.939, -25, 12000), (5.972, -22, 7000), (6.0955, -26, 3000), (6.133, -18, 3900),
                 (6.1598, -15, 4000), (6.176, -17, 2800), (6.251, -22, 8000), (6.2733, -23, 5300),
                 (6.331, -26, 5000), (6.3694, -33, 5500), (6.399, -36, 3000), (6.5202, -26, 4200),
                 (6.5545, -25, 5500), (6.5635, -29, 7300), (6.6396, -24, 4000), (6.6535, -14.5, 4500),
                 (6.662, -19, 7000), (6.691, -24, 4740), (6.783, -38, 4040), (7.1832, -14, 11000),
                 (7.462, -33, 9000)]
    out = np.zeros((2, N))
    for s, db, hz in snap_rows:
        add(out, s, amp(db) * burst(snap_s, hz * 1.2, hz * 0.8))
        add(out, s, amp(db + splash_db) * burst(splash_s, hz * 0.66, hz * 1.2))
    return out


def simmer():
    """Soft bubbles rise from the hot bottom all the time and ring the air in the pot."""
    bubbles = swarm(per_s=400, lo_hz=500, hi_hz=1480, cycles=7.4, spread_db=1.0, rise=0.092, count=10)
    return amp(-59.5) * unit(colour(bubbles, resonance_db(BURNER_AIR)))


def burner():
    """A steady noise roar with the pot's hollow tone, a swelling rumble, and a hum with two close tones beating."""
    # The burner heard through the pot. Each row: frequency in Hz, relative level in dB per Hz.
    roar_colour = [(20, -10), (38, -8), (60, -11), (115, 6), (160, -18.5), (250, -9), (500, -14.5),
                   (1000, -9), (1750, -5), (2200, -13.5), (3300, -27), (7500, -23), (9000, -26.5),
                   (15000, -24)]
    # Low rumble. Each row: time in seconds, level in dB.
    rumble_level = [(0, -56.5), (1.2, -55), (2.4, -55), (3.2, -55.5), (4.6, -65), (5.1, -51), (5.6, -65.5),
                    (6.2, -56), (6.9, -63), (7.5, -53)]
    # Hum. Each row: pitch in Hz, level in dB before it wanders.
    hum_tones = [(49.3, -57.5), (98.3, -61), (100.02, -59)]
    roar = amp(-50.5) * unit(colour(pair_noise(N), read(roar_colour, HZ) + resonance_db(BURNER_AIR)))
    rumble = unit(colour(pair_noise(N), band_db(45, 100)))
    rumble = rumble * amp(np.interp(TIME, *np.transpose(rumble_level)))
    hum = 0
    for hz, db in hum_tones:
        tone = np.sqrt(2) * np.sin(2 * np.pi * hz * (TIME - .08))  # in step at 0.08 s, the first beat
        hum = hum + amp(db) * tone * unsteady(per_s=3.1, depth_db=3.9)
    return roar + rumble + hum


def echoes(t60, treble_t60, wet_db):
    """Direct sound plus a dense noise tail of reflections, bass and treble dying at their own rates."""
    t = np.arange(SR // 2) / SR
    tail = pair_noise(len(t))
    low = signal.sosfilt(signal.butter(2, 3000, fs=SR, output="sos"), tail)
    tail = low * amp(-60 * t / t60) + (tail - low) * amp(-60 * t / treble_t60)
    tail = tail * (t > .0008)
    return (t == 0) + amp(wet_db) * tail / np.linalg.norm(tail[0])


def restless_echoes(x, t60, treble_t60, wet_db, count=5):
    """Reflections off a moving surface: several tails take turns."""
    pace = rng.uniform(6, 16, 30)  # tails a second
    turn = np.cumsum(np.interp(TIME, np.linspace(0, N / SR, 30), pace)) / SR
    out = x
    for k in range(count):
        distance = abs((turn - k + count / 2) % count - count / 2)
        sent = x * np.cos(np.pi / 2 * np.minimum(distance, 1))
        out = out + convolve(sent, echoes(t60, treble_t60, wet_db)) - sent  # the tail alone
    return out


def scene():
    """Liquid and steel echo in the pot, then with the snaps in the kitchen; the rest is heard direct."""
    water = pour() + ladling() + churn() + glugs() + hiss_swells() + spatter() + foam()
    water = restless_echoes(water, t60=0.061, treble_t60=0.043, wet_db=-5.5)
    hits = restless_echoes(knocks() + scrape() + drips(), t60=0.067, treble_t60=0.11, wet_db=-4.5)
    kitchen = echoes(t60=0.42, treble_t60=0.33, wet_db=-10)
    return convolve(amp(-1.5) * water + hits + snaps(), kitchen) + lifted() + simmer() + burner()


def record(dry):
    """Cuts the bass below 38 Hz and the treble above 15650 Hz."""
    dry = signal.sosfilt(signal.butter(6, 38, "high", fs=SR, output="sos"), dry)
    treble_cut = signal.firwin(511, 15650, window=("kaiser", 9), fs=SR)
    return signal.oaconvolve(dry, treble_cut[None], "same")


dry = scene()
out = record(dry)
to_wav(out)
```